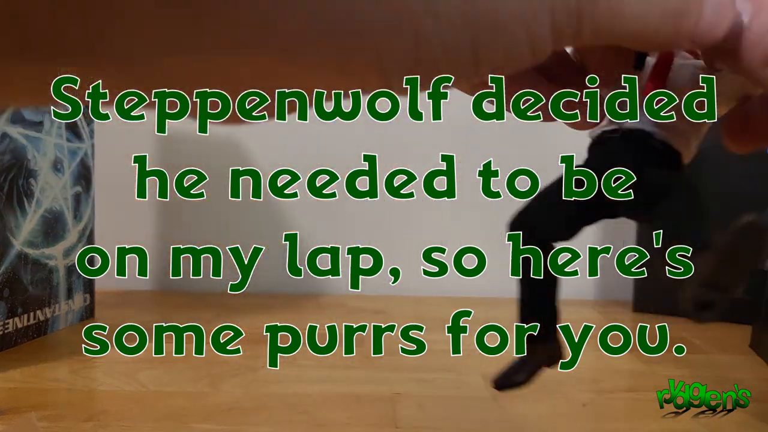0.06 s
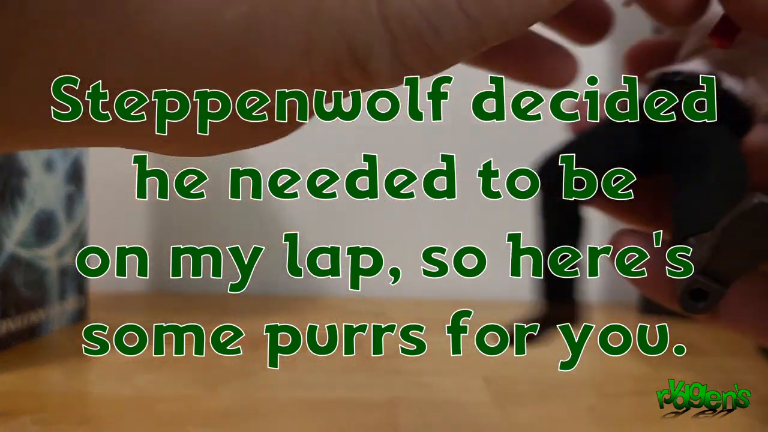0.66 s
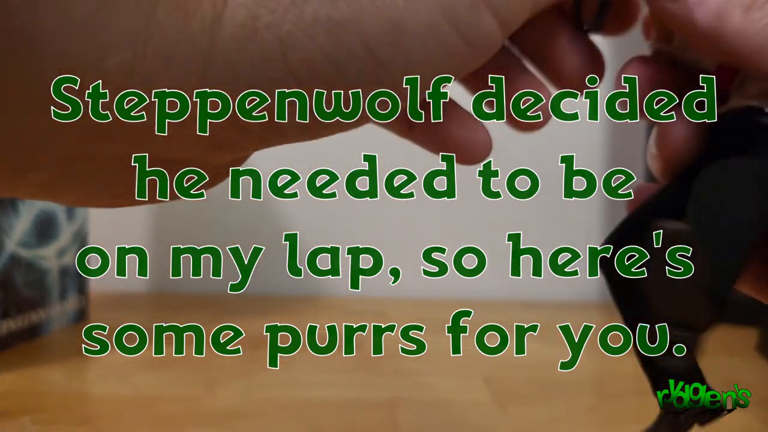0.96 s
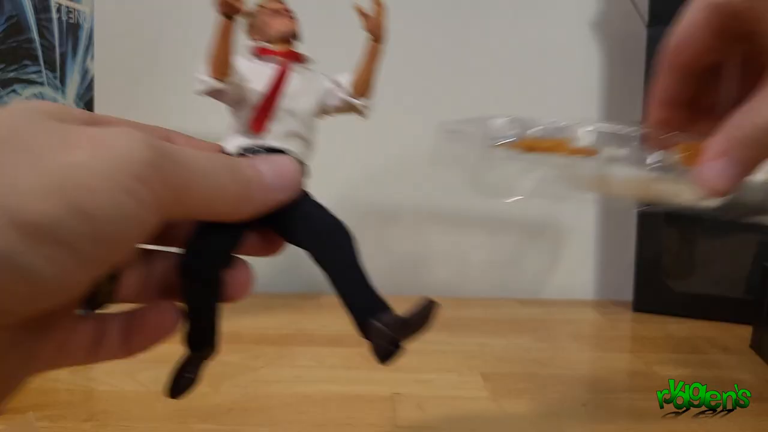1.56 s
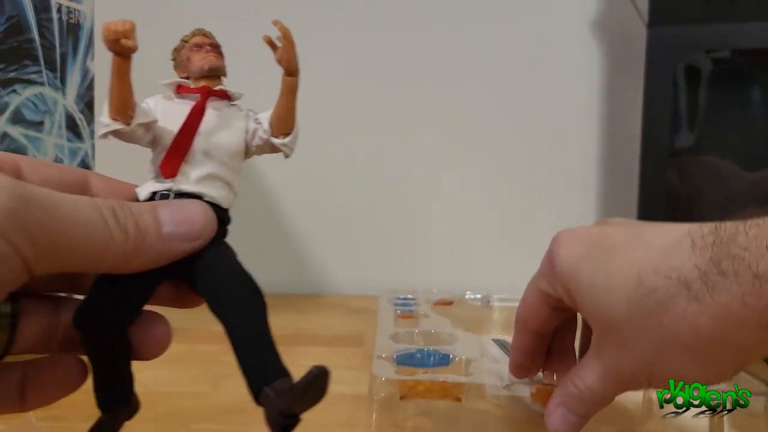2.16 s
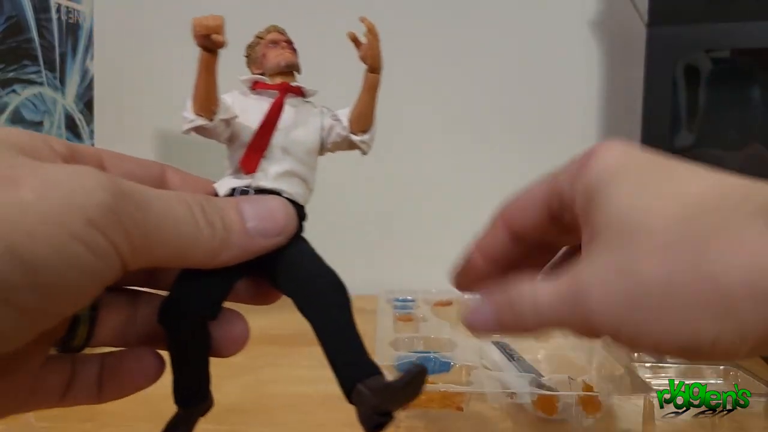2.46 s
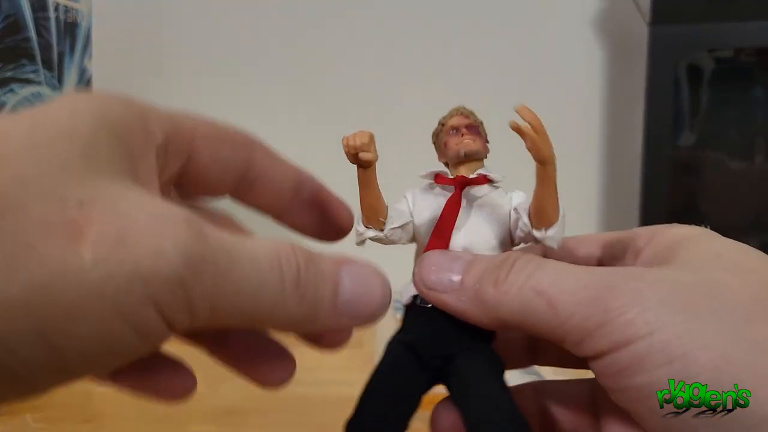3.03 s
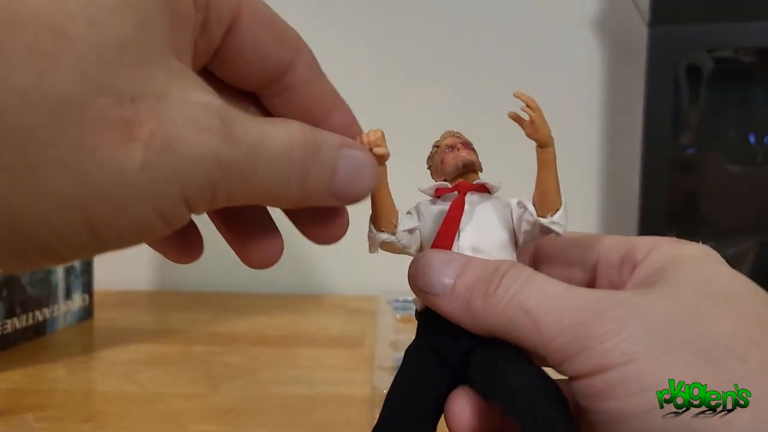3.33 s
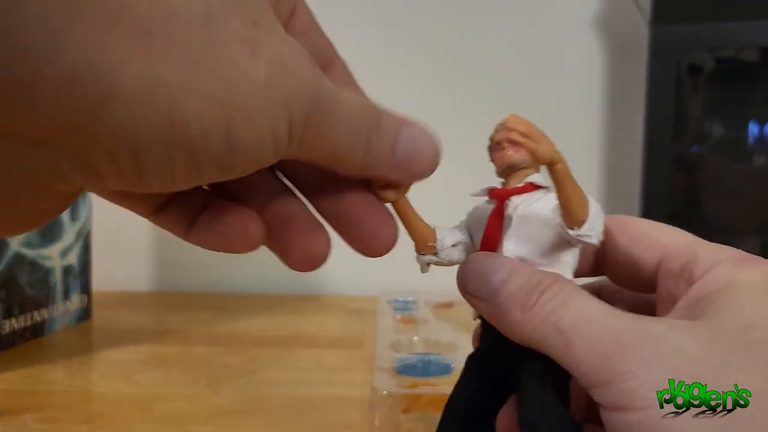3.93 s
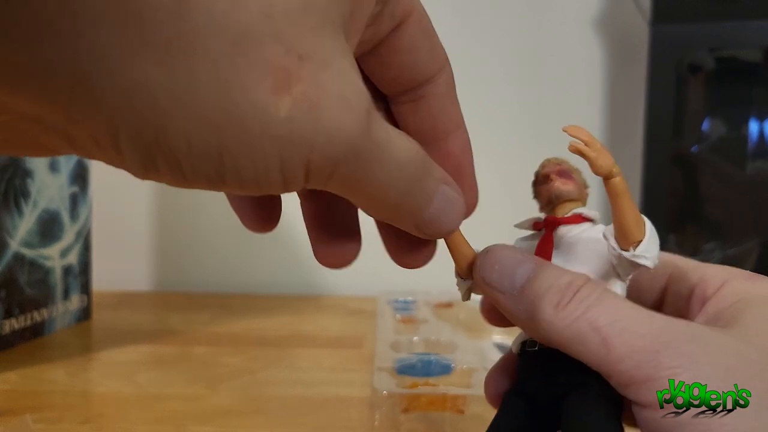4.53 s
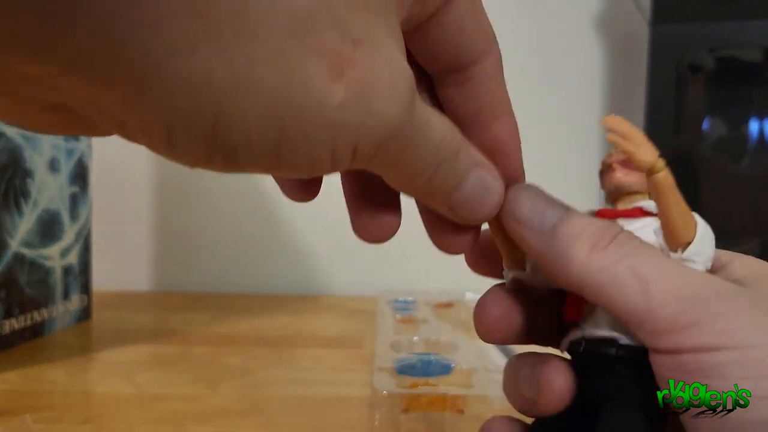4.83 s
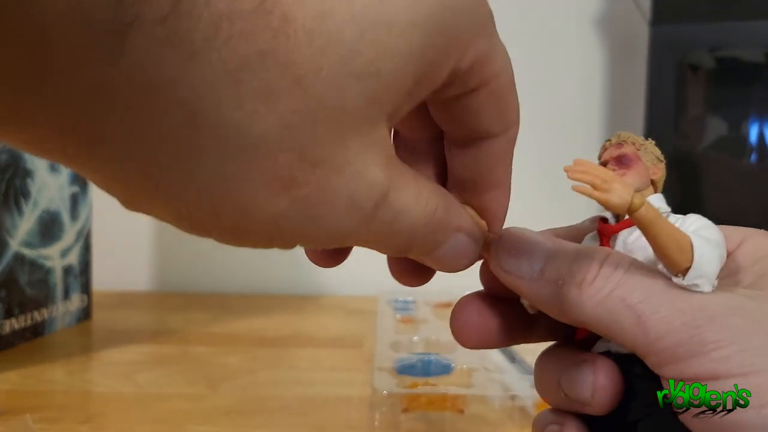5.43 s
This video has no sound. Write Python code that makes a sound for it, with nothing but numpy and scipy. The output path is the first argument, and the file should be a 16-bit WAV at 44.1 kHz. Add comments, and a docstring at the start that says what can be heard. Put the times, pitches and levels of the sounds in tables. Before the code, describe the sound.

Close cat purring runs under cloth rustles, small plastic pieces dropping into a tray and light clicks, with a faint fan hum.

```python
"""A fan hums in a small room. A cat purrs on a lap just left of a camera, its larynx pulsing chest and
throat. Hands pose a small clothed plastic figure over a wooden table: cloth slides and rubs, plastic
clicks. At 1.1 s something soft nudges the camera. From 1.7 s small parts drop, bounce and skid in a plastic
tray. Fingers then slide over plastic while the purr grows, a few of its pulses ticking, loudest just
after 3 s. From 4.3 s an arm joint turns, and near the end a deep tone swells in the room."""
import sys
import numpy as np
from scipy import signal
from scipy.fft import rfft, irfft, next_fast_len
from scipy.io import wavfile
from scipy.ndimage import map_coordinates

SR = 44100
rng = np.random.default_rng(int(sys.argv[2]) if len(sys.argv) > 2 else 0)


def file_out(sig):
    """Save sig as 16-bit WAV at sys.argv[1]."""
    # one column per channel
    cols = np.atleast_2d(sig).T
    # limit, then scale
    lim = np.clip(cols, -1, 1)
    pcm = np.round(lim * 32767).astype(np.int16)
    wavfile.write(sys.argv[1], SR, pcm)


N = 246519


def amp(db):
    """Decibels to gain."""
    return 10 ** (np.asarray(db) / 20)


def unit(x):
    """Scale to rms 1."""
    return x / np.sqrt(np.mean(x ** 2) + 1e-20)


def along(points, hz):
    """(Hz, value) points read on a log axis."""
    knots_hz, values = np.transpose(points)
    return np.interp(np.log(hz + 1), np.log(knots_hz + 1), values)


def envelope_db(points):
    """(s, dB) points to a level per sample, silent outside them."""
    times_s, db = np.transpose(points)
    return np.interp(np.arange(N) / SR, times_s, db, left=-120, right=-120)


def wobble(knots_per_s):
    """Smooth random curve."""
    knots = rng.standard_normal(int(N * knots_per_s / SR) + 4)
    return map_coordinates(knots, [np.arange(N) * knots_per_s / SR])


def filtered(x, response):
    """Apply a response given as a function of Hz."""
    n = x.shape[-1]
    size = next_fast_len(n + SR // 4)
    return irfft(rfft(x, size) * response(np.fft.rfftfreq(size, 1 / SR)), size)[..., :n]


def ring(x, tone, size=8192):
    """Send x through a minimum-phase body of unit energy with the given spectrum."""
    cepstrum = irfft(np.log(amp(along(tone, np.fft.rfftfreq(size, 1 / SR)))))
    cepstrum[1:size // 2] *= 2
    cepstrum[size // 2 + 1:] = 0
    body = irfft(np.exp(rfft(cepstrum)))
    body /= np.linalg.norm(body)
    return signal.fftconvolve(np.atleast_2d(x), body[None], axes=1)[:, :x.shape[-1]]


def placed(x, side):
    """Pan each frequency by its left-minus-right dB."""
    return filtered(x, lambda hz: amp(np.outer([.5, -.5], along(side, hz))))


def add(track, start_s, sound):
    """Mix a sound into the track."""
    part = track[..., max(round(start_s * SR), 0):][..., :sound.shape[-1]]
    part += sound[..., :part.shape[-1]]


def burst(t, t60, spread):
    """Decaying stereo noise; spread scales the part the two microphone ports do not share."""
    noise = rng.standard_normal(len(t)) + spread * rng.standard_normal((2, len(t)))
    return noise * amp(-60 * t / t60)


# Likeness of the two ports. Each row: frequency in Hz, left-right correlation.
PORT_COHERENCE = [(60, 0.86), (300, 0.75), (1000, 0.057), (3000, 0.023), (10000, 0.019)]


def rush(tone):
    """Stereo noise of rms 1, alike in the bass, unrelated in the treble."""
    def mid_side(hz):
        angle = np.arccos(np.clip(along(PORT_COHERENCE, hz), -1, 1)) / 2
        return amp(along(tone, hz)) * [np.cos(angle), np.sin(angle)]
    mid, side = filtered(rng.standard_normal((2, N)), mid_side)
    return unit(np.array([mid + side, mid - side]))


# Room decay. Each row: frequency in Hz, t60 in seconds.
ROOM_T60_S = [(200, 0.21), (1500, 0.39), (5000, 0.42), (14000, 0.66)]


def room(x):
    """Small-room reverberation, each frequency dying at its own rate."""
    hz, t, spectra = signal.stft(rng.standard_normal((2, SR // 2)), SR, nperseg=256)
    tail = signal.istft(spectra * amp(-60 * t / along(ROOM_T60_S, hz)[:, None]), SR, nperseg=256)[1]
    tail = np.pad(tail / np.linalg.norm(tail[0]), ((0, 0), (SR // 200, 0)))
    return signal.fftconvolve(x, tail, axes=1)[:, :x.shape[-1]]


# Fan tones, drone spectrum and air spectrum. Each row: frequency in Hz, level in dB.
FAN_TONES = [(119.1, -64), (144, -64), (193.5, -62), (238, -62.5), (253, -64), (308, -60.5), (317.6, -62.5),
             (430, -66)]
DRONE_DB = [(20, -41), (45, 11.5), (90, 4.5), (160, -8), (205, 3), (245, 5), (310, 4), (345, -3),
            (450, -9.5), (700, -40.5)]
AIR_DB = [(240, -3.5), (400, -27), (432, -8.5), (459, -11.5), (570, -7.5), (877, -15.5), (1020, -15),
          (1650, -28.5), (1830, -27.5), (2310, -32), (4020, -31), (4620, -20), (5640, -34.5), (7210, -25.5),
          (15800, -88)]


def fan(motor_hz=59.55, drift_rad=1.27, waver_db=2):
    """Steady motor hum under wavering tones, a low drone and a faint hiss of air."""
    t = np.arange(N) / SR
    hum = amp(-42) * np.sin(2 * np.pi * motor_hz * t) * amp([[.3], [-.3]])
    for hz, db in FAN_TONES:
        hum += amp(db + waver_db * wobble(8)) * np.sin(2 * np.pi * hz * t + drift_rad * wobble(6))
    return np.sqrt(2) * hum + amp(-50.5) * rush(DRONE_DB) + amp(-62) * rush(AIR_DB)


def airflow(since_s, rise_s, head_start_s=0.053):
    """Flow of one purr stroke: quick swell, slow ebb."""
    flow = np.maximum(since_s + head_start_s, 0) / rise_s
    return flow * np.exp(1 - flow)


# Purr strokes, one per direction of airflow. Each row: start in seconds, pulse rate in Hz, open-to-shut
# gap in seconds, rise in seconds, chest level in dB, throat level in dB, rattle re throat in dB.
PURR_STROKES = [(0.0, 29.5, 0.0065, 0.097, -68, -37, -11), (0.597, 22.6, 0.013, 0.067, -56, -55, 4.5),
                (1.201, 27.5, 0.0038, 0.24, -71, -54, -11), (1.899, 24.3, .013, 0.83, -40, -45, -5),
                (2.701, 26.2, .016, 0.17, -28.5, -38, -7.5), (3.094, 25, .0195, 0.059, -23.5, -31, -4),
                (3.338, 26.2, .0052, 0.075, -45, -31, -4.5), (3.984, 26.7, 0.0098, 0.081, -38, -32, -4.5),
                (4.448, 25, 0.029, 0.19, -43.5, -55, -1), (4.974, 25.6, 0.0058, .06, -45, -35, -6)]
# Chest, throat and rattle spectra. Each row: frequency in Hz, level in dB.
CHEST_DB = [(25, -43), (50, 3), (76, 6), (102, 1.5), (135, -14), (250, -39), (600, -63)]
THROAT_DB = [(50, -31.5), (110, -10.5), (160, 2.5), (210, -2.5), (300, -3.5), (420, -10), (600, -20.5),
             (900, -29.5), (2000, -70.5)]
RATTLE_DB = [(150, -12.5), (350, -0.5), (550, 7.5), (780, -4), (1000, 0.5), (1300, -8.5), (1700, -24.5),
             (3000, -16.5), (6000, -44)]
# Throat panning. Each row: frequency in Hz, left minus right in dB.
CAT_PAN_DB = [(60, -0.5), (200, 11.5), (500, 18.5), (1300, 33.5), (4000, 13.5)]


def purr(jitter_s=0.00067, scatter_db=1.3, closing=0.57, breathy=0.095, pause_s=0.085, lead_s=0.00027):
    """The larynx snaps open and shut about 26 times a second: chest throbs, throat rings and rattles."""
    throbs, snaps, rattles = np.zeros((3, N))
    t = np.arange(SR // 50) / SR
    ends = [stroke[0] - pause_s for stroke in PURR_STROKES[1:]] + [N / SR]
    for (start, rate_hz, gap_s, rise_s, chest_db, throat_db, rattle_db), end in zip(PURR_STROKES, ends):
        for pulse_s in np.arange(start, end, 1 / rate_hz):
            size = airflow(pulse_s - start, rise_s) * amp(scatter_db * rng.standard_normal(1))
            pulse_s += jitter_s * rng.standard_normal()
            add(throbs, pulse_s, -size * amp(chest_db))
            for delay_s, strength in [(0, 1), (gap_s * rng.uniform(0.7, 1.3), closing)]:
                snap = -strength * size * amp(throat_db)
                gap_hiss = breathy * rng.standard_normal(len(t)) * amp(-60 * t / 0.012)
                add(snaps, pulse_s + delay_s, snap)
                add(rattles, pulse_s + delay_s, snap * amp(rattle_db) * ((t == 0) + gap_hiss))
    chest = ring(throbs * amp(26.5), CHEST_DB) * amp([[0], [-17]])
    throat = ring(snaps * amp(15.5), THROAT_DB) + ring(rattles * amp(2.5), RATTLE_DB)
    # The nearer, left port gets it louder and earlier.
    throat = placed(throat, CAT_PAN_DB)
    throat = filtered(throat, lambda hz: np.exp(np.pi * lead_s * np.outer([1j, -1j], hz)))
    return chest + throat + amp(-4.5) * room(throat)


# Rasp spectrum of nose and rubs. Each row: frequency in Hz, level in dB.
RASP_DB = [(900, -9), (1700, -18.5), (2300, -8.5), (2750, -9.5), (3400, -17), (5000, -32.5)]
# Panning of nose, slide and rubs. Each row: frequency in Hz, left minus right in dB.
HISS_PAN_DB = [(1300, 12.5), (2400, 5.5), (4400, 2.5), (8000, -7), (15000, -1.5)]


def nose(linger=1.2, flutter_db=3, level_db=-42):
    """Air hisses in the cat's nose on each stroke, fluttering at the larynx rate."""
    t, gain = np.arange(N) / SR, np.zeros(N)
    for start, rate_hz, _, rise_s, _, throat_db, _ in PURR_STROKES:
        flutter = np.cos(2 * np.pi * rate_hz * (t - start))
        gain += airflow(t - start, linger * rise_s) * amp(throat_db + flutter_db * flutter)
    return placed(amp(level_db) * gain * rush(RASP_DB), HISS_PAN_DB)


def swell(start_s, length_s, attack_s, sag_db_per_s, release_db_per_s):
    """Gain of one hand movement: smooth attack, sag, release."""
    t = np.maximum(np.arange(N) / SR - start_s, 0)
    grip = np.sin(np.pi / 2 * np.minimum(t / attack_s, 1)) ** 2
    return grip * amp(-sag_db_per_s * t - release_db_per_s * np.maximum(t - length_s, 0))


# Cloth slide. One row: start in seconds, length in seconds, level in dB.
CLOTH_SLIDE = (-0.018, 0.34, -51.5)
# Its spectrum. Each row: frequency in Hz, level in dB.
SLIDE_DB = [(530, -34), (900, -11), (1890, -14.5), (2270, -4), (2850, -3), (3530, -6), (4430, 1.5),
            (5310, -3.5), (8270, -1), (9100, -10), (10900, -13.5), (12900, -11.5), (13500, -11.5),
            (14900, -5.5), (15800, -15.5)]


def cloth_slide():
    """One long slide of cloth gives a bright, fading hiss."""
    start_s, length_s, db = CLOTH_SLIDE
    gain = amp(db) * swell(start_s, length_s, attack_s=0.02, sag_db_per_s=16.5, release_db_per_s=102)
    return placed(gain * rush(SLIDE_DB), HISS_PAN_DB)


# Whistles in the slide. Each row: start in seconds, length in seconds, initial pitch in Hz, level in dB.
CLOTH_WHISTLES = [(-0.02, 0.1, 13650, -65), (0.3, 0.04, 15800, -72), (0.375, 0.04, 13100, -77)]


def whistles(fall_hz_per_s=12000, waver_hz=60):
    """Faint, very high whistles fall in pitch as the cloth slides."""
    t, out = np.arange(N) / SR, np.zeros(N)
    for start_s, length_s, hz, db in CLOTH_WHISTLES:
        pitch_hz = hz - fall_hz_per_s * (t - start_s) + waver_hz * wobble(400)
        gain = amp(db) * swell(start_s, length_s, attack_s=0.02, sag_db_per_s=7, release_db_per_s=400)
        out += gain * np.sin(2 * np.pi * np.cumsum(pitch_hz) / SR)
    return out


# Bright ticks. Each row: start in seconds, level in dB, centre in Hz.
BRIGHT_TICKS = [(0.105, -42, 3000), (1.3505, -50.5, 7100), (1.409, -57.5, 5630), (2.2548, -53, 4500),
                (2.5336, -42.5, 4500), (2.67, -44, 5500), (2.7782, -45.5, 4480), (2.818, -42, 5597),
                (3.094, -46, 5340), (3.1135, -47, 6260), (3.131, -39, 6100), (3.1546, -46.5, 4270),
                (3.1757, -45, 4409), (3.4023, -46.5, 4590), (3.6897, -54.5, 4830), (4.687, -46, 6430),
                (5.251, -56.5, 4500)]


def ticks(width_ratio=1.25):
    """Tiny bright clicks, some from handled plastic, some on the purr's pulses."""
    out, t = np.zeros((2, N)), np.arange(SR // 10) / SR
    for start_s, db, hz in BRIGHT_TICKS:
        tone = [(hz / 6, -22), (hz / width_ratio, -13), (hz, 0),
                (hz * width_ratio, -8), (hz * 2, -20), (hz * 3, -26)]
        click = burst(t, t60=0.014, spread=1.2) * (1 - np.exp(-t / .0003))
        add(out, start_s, amp(db - 5) * ring(click, tone))
    return out + amp(-18) * room(out)


def pressure(rubs):
    """Hiss and rasp gains over a series of rubs; each eases off, then lets go."""
    power = np.zeros((2, N))
    for start_s, attack_s, length_s, hiss_db, rasp_db in rubs:
        gain = swell(start_s, length_s, attack_s, sag_db_per_s=2, release_db_per_s=275)
        power += (amp([[hiss_db], [hiss_db + rasp_db]]) * gain) ** 2
    return np.sqrt(power)


# Rubs on the clothes, fingers on plastic, turns of the arm joint.
# Each row: start, attack and length in seconds, hiss level in dB, rasp re hiss in dB.
CLOTH_MOVES = [(0.568, .018, 0.18, -59.5, -12), (0.755, 0.036, 0.056, -55, -18),
               (0.855, 0.014, 0.088, -56.5, -10), (0.96, .02, 0.14, -61, -6), (1.15, 0.013, 0.28, -70, -18)]
FINGER_MOVES = [(2.42, 0.063, 0.085, -57.5, -20.5), (2.54, 0.023, 0.22, -70.5, 10),
                (2.725, 0.057, 0.14, -62.5, 5.5), (2.86, 0.028, 0.1, -65.5, -15),
                (3.105, 0.016, 0.018, -57.5, 7), (3.14, 0.022, 0.11, -71.5, -14),
                (3.235, 0.065, 0.088, -62, -10), (3.315, 0.022, 0.18, -67, 7),
                (3.62, 0.031, 0.08, -72.5, -6), (3.955, 0.019, 0.097, -66.5, -13)]
JOINT_MOVES = [(4.265, 0.052, 0.28, -66, -11), (4.485, 0.061, 0.052, -51, -6.5),
               (4.635, 0.028, 0.32, -65, -19), (4.885, 0.0221, 0.045, -56.5, -15),
               (4.975, 0.031, 0.3, -69.5, 2)]
# Their hiss spectra. Each row: frequency in Hz, level in dB.
CLOTH_DB = [(880, -50), (1500, -23), (1960, -12), (2340, -20), (2710, -2.5), (3430, -7), (3940, -4),
            (7400, -1.5), (10500, -10), (12700, -9.5), (15800, -6.5)]
FINGER_DB = [(880, -32), (1500, -5.5), (1880, -14), (2290, -7), (3600, -11), (4480, -0.5), (5670, -4.5),
             (7930, -7.5), (10300, -19.5), (15200, -12), (15800, -18.5)]
JOINT_DB = [(880, -20), (1500, -11), (1840, -16), (2290, -11.5), (2740, -13.5), (3570, -2), (5780, -2),
            (7770, 0.5), (10900, -12), (14000, -8), (15800, -7)]


def rubbing(grain_db=1.0, catch_db=1.43):
    """Cloth, fingers and a joint catch and slip in turn: grained hiss over a lower rasp."""
    out = np.zeros((2, N))
    for rubs, tone in [(CLOTH_MOVES, CLOTH_DB), (FINGER_MOVES, FINGER_DB), (JOINT_MOVES, JOINT_DB)]:
        hiss, rasp = pressure(rubs)
        slips = amp(grain_db * wobble(500) + catch_db * wobble(70))
        out += slips * (hiss * rush(tone) + amp(-4.5) * rasp * rush(RASP_DB))
    return placed(out, HISS_PAN_DB)


# Camera bumps. Each row: centre in seconds, level in dB, frequency in Hz, half length in seconds.
CAMERA_BUMPS = [(1.083, -23.5, 83.5, 0.012), (1.135, -36, 74, 0.018)]


def bumps():
    """Something soft nudges the camera's left side."""
    t, push = np.arange(N) / SR, np.zeros(N)
    for centre_s, db, hz, half_s in CAMERA_BUMPS:
        window = np.exp(-((t - centre_s) / half_s) ** 2)
        push += amp(db) * window * np.sin(2 * np.pi * hz * (centre_s - t))
    return push * amp([[0], [-26]])


# Parts landing in the tray. Each row: start in seconds, level in dB, snap offset in dB, knock pitch in Hz,
# its prominence in dB, left minus right in dB, first flight in seconds.
LANDINGS = [(1.687, -48, -2, 670, 14, 0, .006), (2.0554, -15.5, -6, 930, 6.5, 4.5, .0157),
            (2.099, -26, -5.5, 1440, 1.5, 1, .009), (2.178, -35.5, -9, 1550, 13, 1, .003),
            (2.2818, -24.5, -2.5, 1710, 17, 4, .0045), (2.3202, -16.5, -5.5, 957, 8, 0.5, .0125),
            (2.438, -35, -11, 860, 10, 8, .004)]


def contacts(count=3, flight_ratio=0.72, loss_db=4, dull_db=2, pitch_ratio=1.032):
    """A part bounces ever faster, rocking side to side; each contact is weaker, duller and higher."""
    for start_s, db, snap_db, pitch_hz, focus_db, side_db, flight_s in LANDINGS:
        for k in range(count):
            yield (start_s, db - loss_db * k, snap_db - dull_db * k,
                   pitch_hz * pitch_ratio ** k, focus_db, side_db * (-1) ** k)
            start_s += flight_s * flight_ratio ** k


# Tray modes. Each row: frequency in Hz, level in dB, t60 in seconds.
TRAY_MODES = [(569, -32, 0.2), (741, 9.5, 0.073), (860, -4, 0.06), (823, -50.5, 0.12), (1032, -19, 0.36),
              (1093, -2.5, 0.0466), (1260, 13.5, 0.03), (1395, -15, 0.087), (1550, -15, 0.13),
              (1540, -20, 0.12), (1635, 12, 0.039), (1933, -1, 0.052), (2380, -32, 0.13), (2980, -13, 0.1),
              (4260, -8, 0.064)]
# Knock, snap and table-top spectra. Each row: frequency in Hz, level in dB.
KNOCK_DB = [(210, -53), (350, -34.5), (559, -5.5), (693, -14), (941, -5.5), (1170, -10), (1500, -4.5),
            (1860, -16.5), (2080, -14), (4000, -33), (5200, -48), (8800, -120)]
SNAP_DB = [(1000, -32), (2200, 0.5), (2700, 2), (3250, -3), (4200, -3), (6100, -8.5), (7200, -4.5),
           (9300, -20.5), (12000, -28), (15800, -26.5)]
THUD_DB = [(40, -30), (90, -3.5), (160, -2), (350, -4), (560, -11.5), (900, -11.5), (2500, -53.5)]
# Tray panning. Each row: frequency in Hz, left minus right in dB.
TRAY_PAN_DB = [(300, -2), (700, 1.5), (1300, 0), (4400, -1), (8000, -10.5), (15000, 1.5)]


def tray_taps(port_scatter_db=3.1, port_scatter_rad=0.23):
    """Each contact gives a short ring of the tray, a hollow knock, a sharp snap and a table thud."""
    out, t = np.zeros((2, N)), np.arange(SR // 2) / SR
    for start_s, db, snap_db, pitch_hz, focus_db, side_db in contacts():
        modes = np.zeros((2, len(t)))
        for hz, mode_db, t60 in TRAY_MODES:
            decay = amp(mode_db + rng.normal(0, port_scatter_db, (2, 1)) - 60 * t / t60)
            phase = 2 * np.pi * (hz * t + rng.random()) + rng.normal(0, port_scatter_rad, (2, 1))
            modes += decay * np.sin(phase)
        modes *= 1 - np.exp(-t / 0.0013)
        hollow = [(pitch_hz / 1.35, 0), (pitch_hz, focus_db), (pitch_hz * 1.35, 0)]
        knock = ring(burst(t, t60=0.038, spread=0.56), KNOCK_DB)
        knock = ring(knock, hollow) * amp(-focus_db / 4)
        snap = ring(burst(t, t60=0.042, spread=2.88), SNAP_DB)
        thud = ring(burst(t, t60=0.2, spread=0.16), THUD_DB)
        tap = amp(-25.5) * modes + amp(-6) * knock + amp(snap_db - 18) * snap + amp(-24) * thud
        port_gains = amp([[db + side_db / 2], [db - side_db / 2]])
        add(out, start_s, port_gains * (tap + amp(-4.5) * room(tap)))
    return placed(out, TRAY_PAN_DB)


# Skids. Each row: start and end in seconds, level in dB, centre in Hz, roll-off above it in dB per octave.
PART_SKIDS = [(2.055, 2.133, -39.5, 2680, 11.5), (2.317, 2.553, -60.5, 7000, 3),
              (5.21, 5.265, -57, 699.2, 22)]


def skids(judder_db=0.5):
    """A part scrapes along briefly, juddering."""
    out = np.zeros((2, N))
    for start, end, db, hz, db_per_octave in PART_SKIDS:
        outline = [(start - .003, db - 35), (start, db), (end, db - 6.5), (end + 0.071, db - 35)]
        tone = [(hz / 4, -20), (hz, 0), (hz * 4, -2 * db_per_octave)]
        out += amp(envelope_db(outline) + judder_db * wobble(360)) * rush(tone)
    return placed(out, TRAY_PAN_DB)


# Skin grain spectrum. Each row: frequency in Hz, level in dB.
GRAIN_DB = [(1000, -22), (2300, -18), (3300, -4), (4500, -3), (6500, -6), (9000, -12), (15000, -20)]


def skin_crackle(grains_per_s=90, size_db=4, level_db=-7):
    """Skin catching on plastic gives tiny sharp grains, louder under a harder rub."""
    catches = rng.random(N) < grains_per_s / SR
    sizes = amp(size_db * np.minimum(rng.exponential(size=N), 3))
    port_gains = 1 + .5 * rng.standard_normal((2, N))
    grains = ring(catches * sizes * port_gains, GRAIN_DB)
    return unit(grains) * amp(level_db) * pressure(FINGER_MOVES)[0]


# Swell of the deep tone. Each row: time in seconds, level in dB.
BOOM_DB = [(4.8, -69), (5.0, -48), (5.2, -44), (5.4, -47.5), (5.59, -60)]


def boom(hz=51.04):
    """A deep tone swells in the room and fades."""
    return np.sqrt(2) * amp(envelope_db(BOOM_DB)) * np.sin(2 * np.pi * hz * np.arange(N) / SR)


def scene():
    """Cat, hands and room together."""
    friction = cloth_slide() + rubbing() + whistles() + skin_crackle()
    hands = friction + tray_taps() + skids() + ticks() + bumps()
    return purr() + nose() + hands + fan() + boom()


def record(dry, top_hz=15850):
    """The camera keeps nothing above its band limit."""
    return filtered(dry, lambda hz: hz < top_hz)


dry = scene()
out = record(dry)
file_out(out)
```